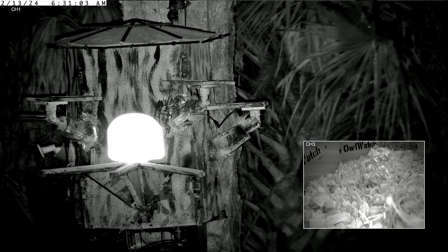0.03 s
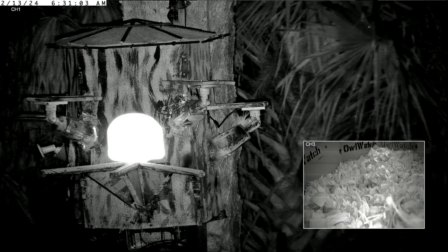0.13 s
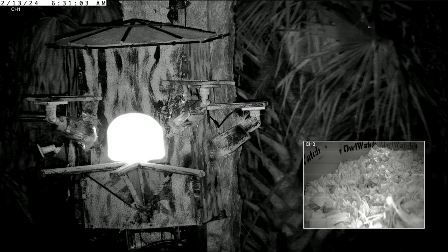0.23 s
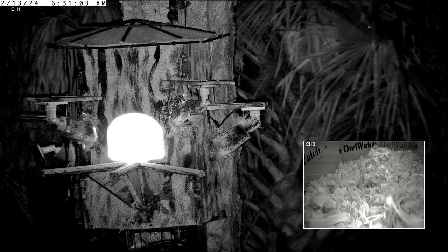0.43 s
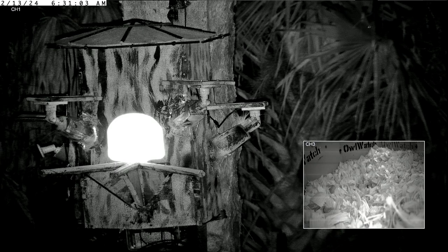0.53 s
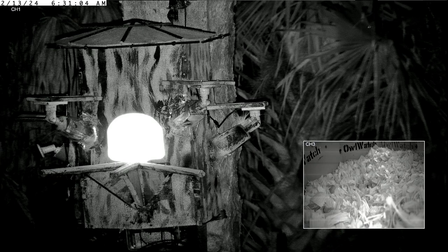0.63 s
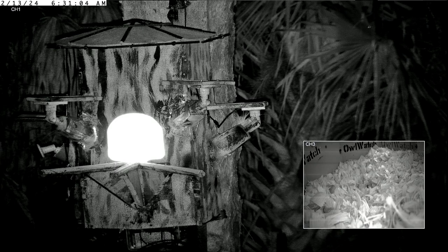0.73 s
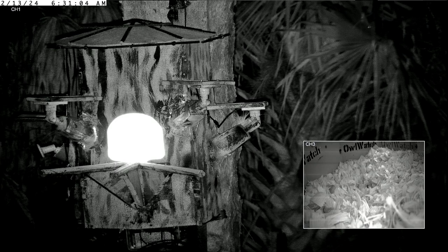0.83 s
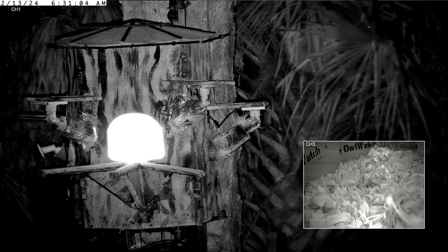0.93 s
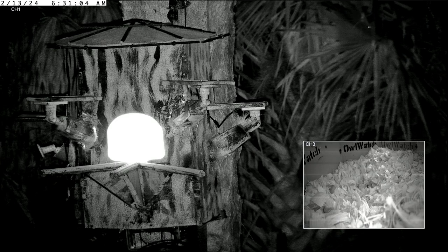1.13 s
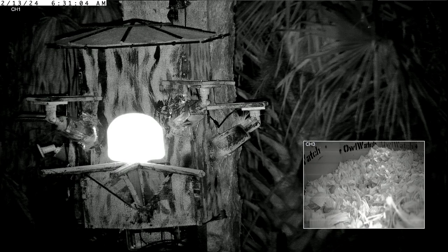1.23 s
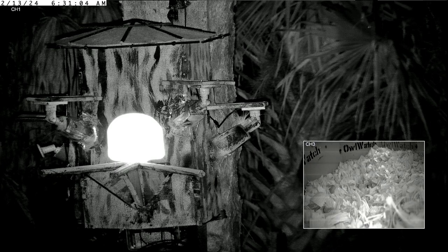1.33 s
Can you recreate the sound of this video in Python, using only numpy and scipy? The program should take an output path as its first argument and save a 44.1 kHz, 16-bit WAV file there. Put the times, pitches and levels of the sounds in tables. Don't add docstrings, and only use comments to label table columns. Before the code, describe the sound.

An owl hoots twice in quick hoarse-to-clear bursts over low night rumble and hiss

```python
import sys
import numpy as np
from scipy import signal
from scipy.io import wavfile
from scipy.ndimage import uniform_filter1d

SR = 44100
rng = np.random.default_rng(int(sys.argv[2]) if len(sys.argv) > 2 else 0)


def natural_amplitude(level_db):
    exponent = np.asarray(level_db, float) / 20
    return 10 ** exponent


def generate_wav(sig):
    pcm = np.round(np.clip(np.atleast_2d(sig).T, -1, 1) * 32767).astype(np.int16)
    wavfile.write(sys.argv[1], SR, pcm)


N = 61739

# centre_hz, level_db
NIGHT_SPECTRUM = [(25, -25), (120, -1), (480, -10.5), (660, -21), (1000, -26.5), (1200, -37), (2200, -59),
                  (3600, -63.5)]
# centre_hz, width_hz, level_db
BOX_RINGS = [(62, 16, -8), (86, 16, -8), (133, 20, -3.5), (165, 25, -11), (430, 40, -15), (545, 35, -15),
             (885, 70, -22), (1005, 50, -26)]
# pitch_hz, level_db
CIRCUIT_WHINES = [(1023, -72), (1082, -72), (1346, -79), (1427, -82), (1583, -83), (1656, -77), (1750, -83),
                  (2000, -79), (2428, -89), (2740, -90), (2834, -90), (2918, -85), (3085, -89), (3262, -89)]
# centre_hz, width_hz, level_db
RASP_RESONANCES = [(310, 70, -2), (385, 50, -3), (523, 35, -2), (600, 45, -7), (740, 90, -10),
                   (810, 50, -11), (890, 80, -5), (1050, 150, -17)]
# time_s, rasp_level_db
BREATH_EFFORT = [(0.071, -36.5), (.14, -47), (0.254, -44.5), (0.264, -31.5), (.31, -31.5), (.34, -34),
                 (.39, -35), (.49, -36), (.53, -37.5), (.6, -49.5), (0.641, -30.5), (.7, -43), (.8, -43),
                 (.95, -54.5)]
# start_s, length_s, pitch_hz, level_db, overtones_db
HOOT_NOTES = [(0.062, 0.031, 396, -25.5, -8), (0.27, .04, 287, -42.5, 7), (0.286, .03, 305, -32.5, -8.5),
              (0.31, 0.052, 409, -18.5, -4.5), (0.368, 0.029, 405, -37.5, 15.5),
              (0.373, 0.029, 330, -31, -3), (0.424, 0.037, 385, -33, -7), (0.437, .03, 295, -33.5, -2),
              (0.463, 0.046, 326, -31, -4.5), (0.5, 0.056, 391, -27, 4.5), (0.549, 0.063, 402, -24.5, 1.5),
              (0.602, .045, 303, -33, -2), (0.631, 0.029, 389, -30.5, -14), (0.661, .05, 302, -39, 2),
              (0.669, .03, 421, -31, -1), (.715, .035, 424, -37, 5), (0.757, .05, 380.3, -45, -7),
              (1.285, .07, 300.8, -43, -28)]
LOW_NOTE_PARTIALS = [0, -7, -5, -32]
HIGH_NOTE_PARTIALS = [-2, -13.5, -40.5, -58]


def unit(x):
    return x / np.sqrt(np.mean(x ** 2))


def noise_band(hz, width_hz, order=1):
    edges = np.clip([hz - width_hz / 2, hz + width_hz / 2], 5, SR / 2.2)
    sos = signal.butter(order, edges, "bandpass", fs=SR, output="sos")
    return signal.sosfilt(sos, rng.standard_normal(N))


def walk(per_s):
    hold = max(int(SR / per_s), 2)
    steps = np.repeat(rng.standard_normal(400), hold)[:N]
    return unit(uniform_filter1d(uniform_filter1d(steps, hold), hold))


def night():
    swell_db, flicker_db, ring_flicker_db = 0.6, 1.5, 1.2
    hz, db = np.array(NIGHT_SPECTRUM).T
    swell = walk(3)
    air = np.zeros(N)
    for f in 25 * 2 ** (np.arange(23) / 3):
        level_db = np.interp(np.log(f), np.log(hz), db)
        level_db = level_db + swell_db * swell * (f < 1200)
        level_db = level_db + flicker_db * walk(29) * (f < 1300)
        air += natural_amplitude(level_db) * noise_band(f, f / 4, order=2)
    ring = np.zeros(N)
    for f, width_hz, db in BOX_RINGS:
        ring += natural_amplitude(db + ring_flicker_db * walk(14)) * unit(noise_band(f, width_hz))
    return natural_amplitude(-41) * unit(unit(air) + ring)


def circuit():
    mains_hz, mains_db, db_per_khz = 60, -91.5, -4.5
    even_db, scatter_db = -8, 1.5
    harmonic = np.arange(21, 61)
    harmonic_hz = harmonic * mains_hz
    harmonic_db = mains_db + db_per_khz * harmonic_hz / 1e3 + even_db * (harmonic % 2 == 0)
    harmonic_db = harmonic_db + scatter_db * rng.standard_normal(len(harmonic))
    hz, db = np.hstack([[harmonic_hz, harmonic_db], np.array(CIRCUIT_WHINES).T])
    turns = hz[:, None] * np.arange(N) / SR + rng.random((len(hz), 1))
    return np.sqrt(2) * natural_amplitude(db) @ np.sin(2 * np.pi * turns)


def wood(voice):
    t60_s, gap_s, dull_above_hz, echo_db = 0.56, 0.014, 1240, -19
    t = np.arange(N) / SR
    tail = rng.standard_normal(N) * natural_amplitude(-60 * t / t60_s) * (t > gap_s)
    tail = signal.sosfilt(signal.butter(2, dull_above_hz, fs=SR, output="sos"), tail)
    tail = tail / np.sqrt(np.sum(tail ** 2))
    return natural_amplitude(echo_db) * signal.fftconvolve(voice, tail)[:N]


def breath():
    rasp = np.zeros(N)
    for f, width_hz, db in RASP_RESONANCES:
        rasp += natural_amplitude(db + 0.7 * walk(27)) * unit(noise_band(f, width_hz, order=2))
    time_s, effort_db = np.array(BREATH_EFFORT).T
    return natural_amplitude(np.interp(np.arange(N) / SR, time_s, effort_db)) * unit(rasp)


def note(start_s, length_s, pitch_hz, level_db, overtones_db):
    low_hz, high_hz = 301.4, 401.8
    hoarse_low, hoarse_high = 0.5, 0.08
    rise_per_s, jitter, shimmer_db, wobble_per_s = 0.9, 0.02, 2.5, 50
    attack_s = 0.32 * length_s
    t = np.arange(N) / SR - start_s
    high = np.clip((pitch_hz - low_hz) / (high_hz - low_hz), 0, 1)
    hoarse = hoarse_low + high * (hoarse_high - hoarse_low)
    to_edge_s = np.minimum(t, length_s - t)
    envelope = np.sin(np.pi / 2 * np.clip(to_edge_s / attack_s, 0, 1))
    rise = rise_per_s * (1 - high) * np.clip(t - length_s / 2, -length_s, length_s)
    pitch = pitch_hz * (1 + rise + jitter * hoarse * walk(wobble_per_s))
    phase = 2 * np.pi * np.cumsum(pitch) / SR
    tone = np.zeros(N)
    for k, (low_db, high_db) in enumerate(zip(LOW_NOTE_PARTIALS, HIGH_NOTE_PARTIALS)):
        partial_db = low_db + high * (high_db - low_db) + overtones_db * (k > 0)
        shimmer = shimmer_db * hoarse * walk(wobble_per_s)
        tone += natural_amplitude(partial_db + shimmer) * np.sin((k + 1) * phase)
    return np.sqrt(2) * natural_amplitude(level_db) * envelope * tone


def owl():
    return sum(note(*row) for row in HOOT_NOTES) + breath()


def scene():
    voice = owl()
    return (night() + circuit() + wood(voice) + voice)[None]


def roll_off(x):
    return signal.sosfilt(signal.butter(12, 16340, fs=SR, output="sos"), x)


def record(dry):
    top_hz, switch_on_s, fade_in_s = 3560, 0.0732, 0.0013
    pop_db, pop_decay_s, pop_rise_s = -23, 0.0003, 0.00002
    heard = signal.sosfilt(signal.ellip(9, 0.5, 75, top_hz, fs=SR, output="sos"), dry)
    since = np.arange(N) / SR - switch_on_s
    pop = np.exp(-np.abs(since) / pop_decay_s) - np.exp(-np.abs(since) / pop_rise_s)
    mix = heard * np.clip(since / fade_in_s, 0, 1) + natural_amplitude(pop_db) * pop
    mix = (since >= 0) * mix
    return roll_off(mix)


dry = scene()
out = record(dry)
generate_wav(out)
```